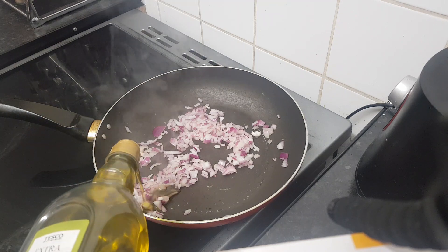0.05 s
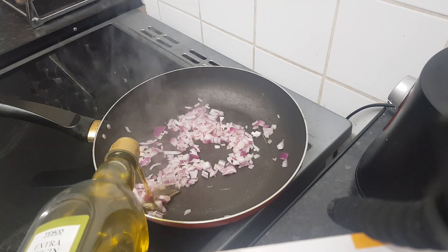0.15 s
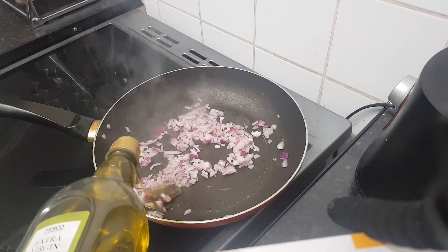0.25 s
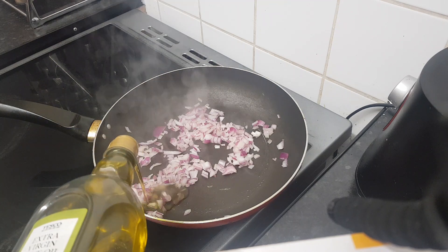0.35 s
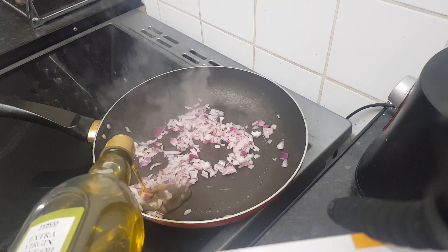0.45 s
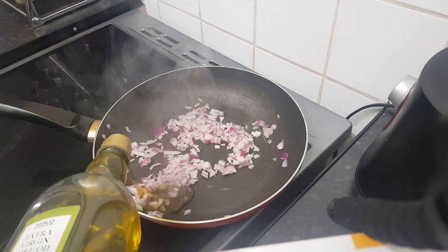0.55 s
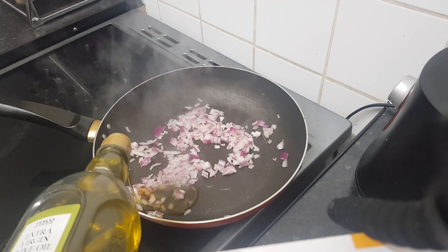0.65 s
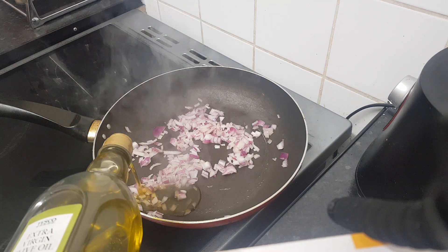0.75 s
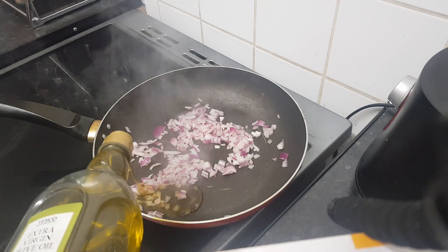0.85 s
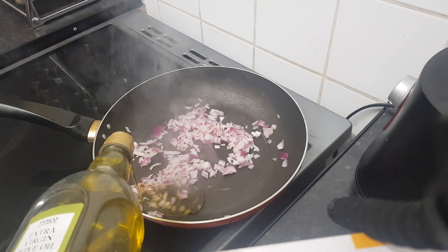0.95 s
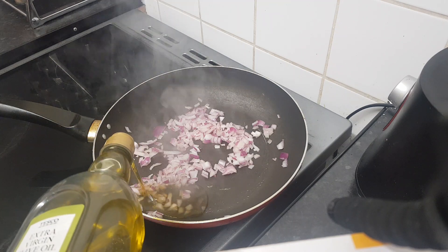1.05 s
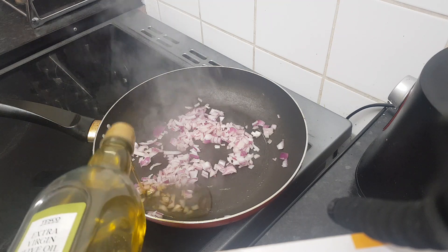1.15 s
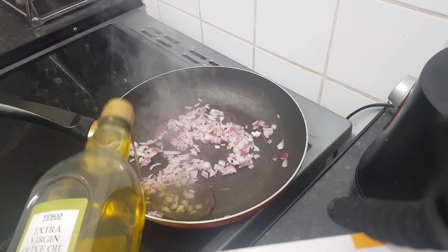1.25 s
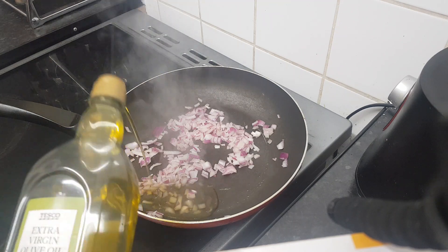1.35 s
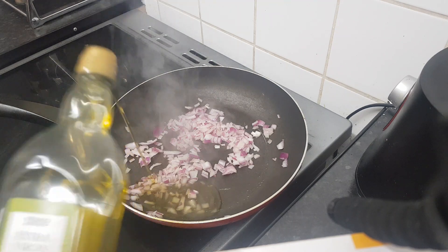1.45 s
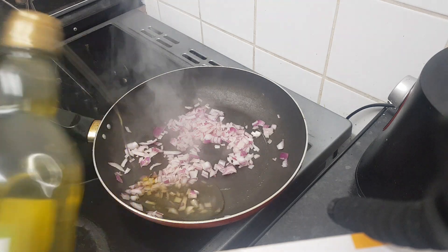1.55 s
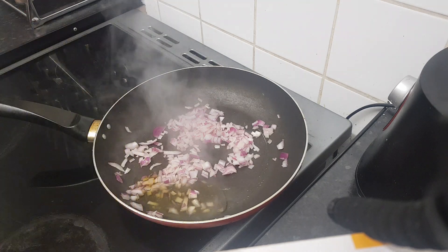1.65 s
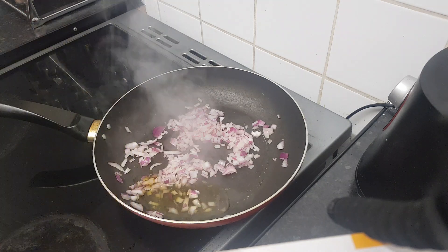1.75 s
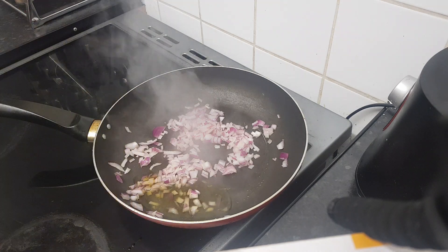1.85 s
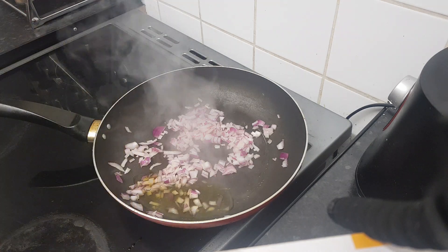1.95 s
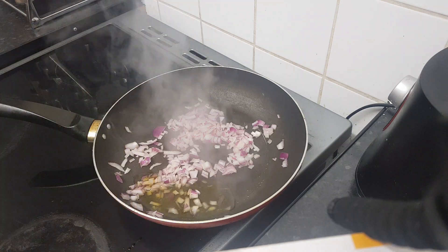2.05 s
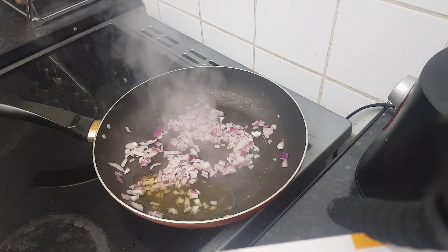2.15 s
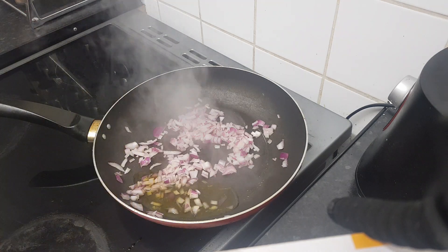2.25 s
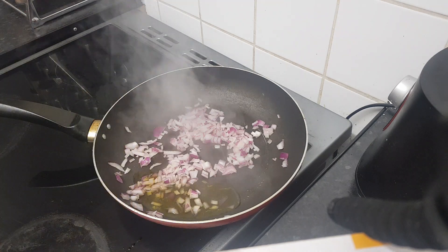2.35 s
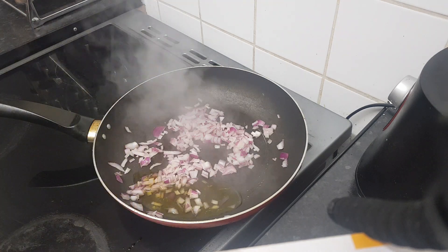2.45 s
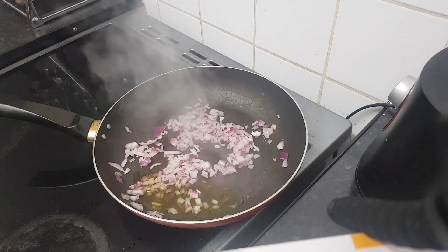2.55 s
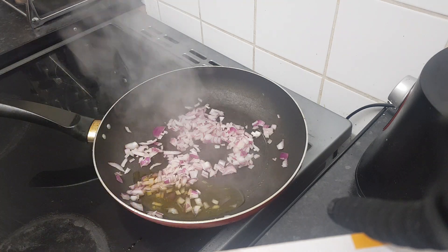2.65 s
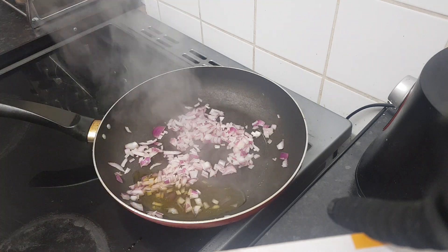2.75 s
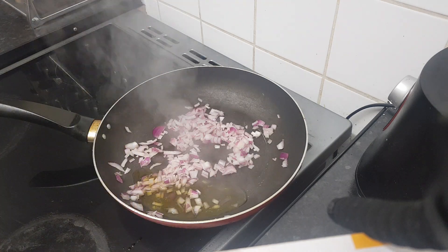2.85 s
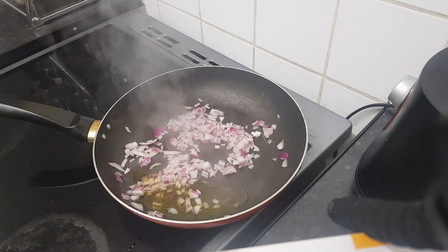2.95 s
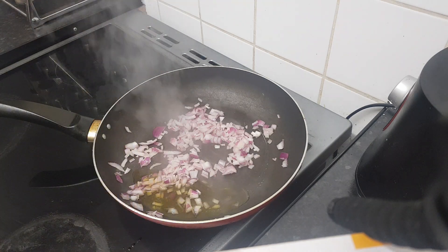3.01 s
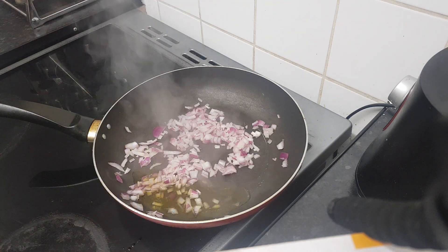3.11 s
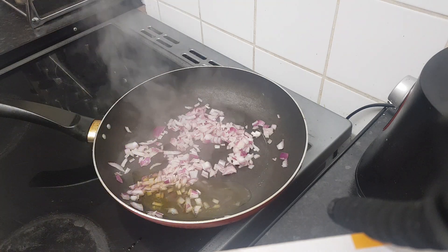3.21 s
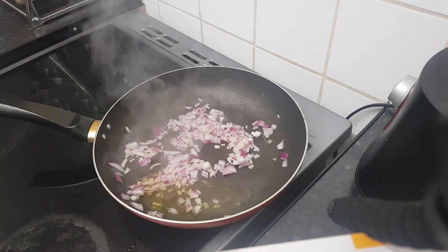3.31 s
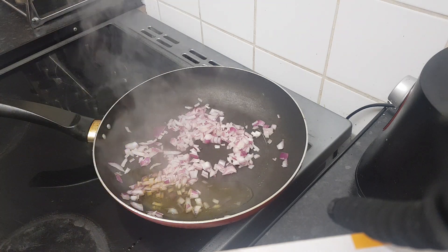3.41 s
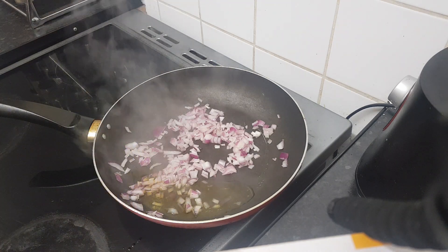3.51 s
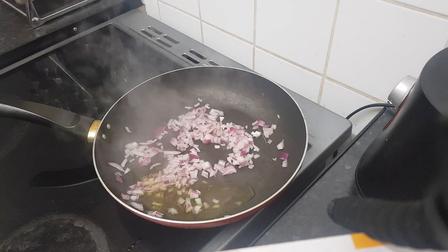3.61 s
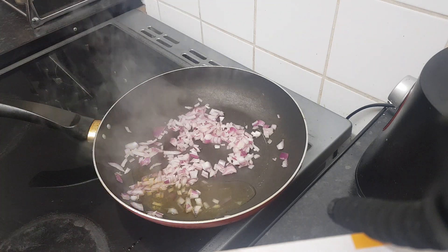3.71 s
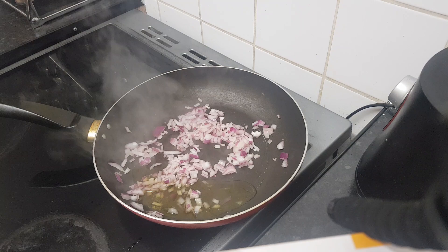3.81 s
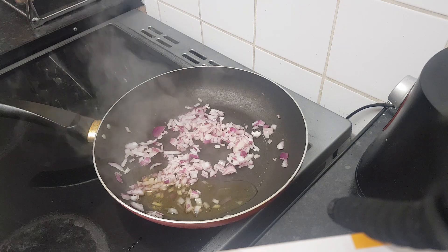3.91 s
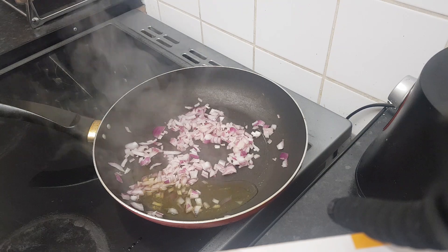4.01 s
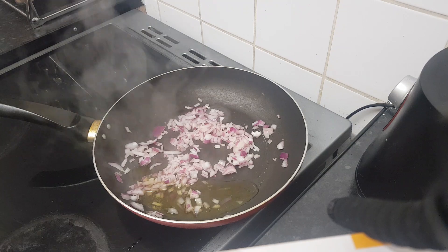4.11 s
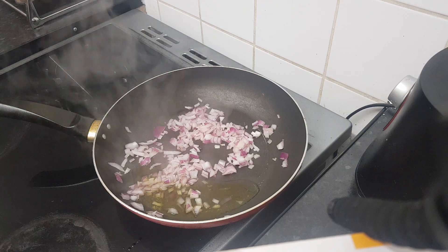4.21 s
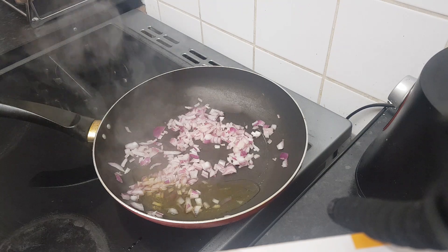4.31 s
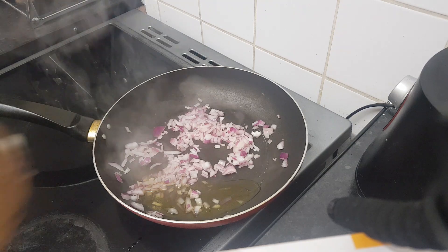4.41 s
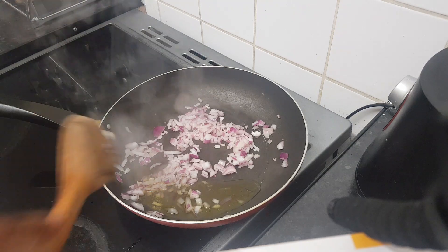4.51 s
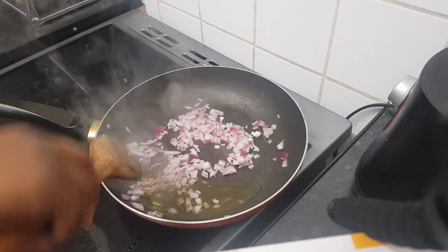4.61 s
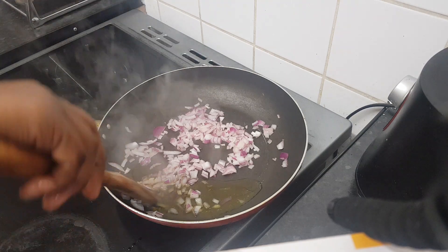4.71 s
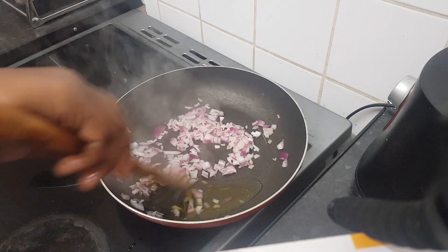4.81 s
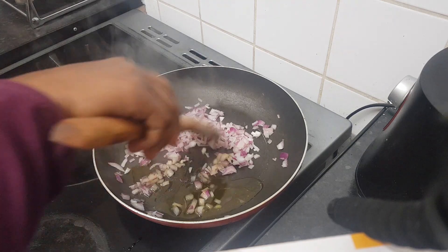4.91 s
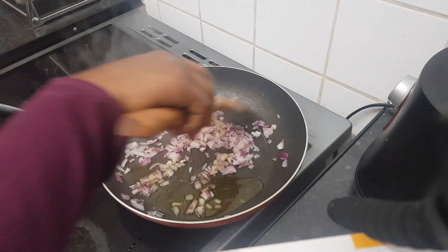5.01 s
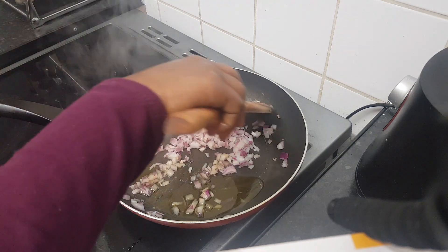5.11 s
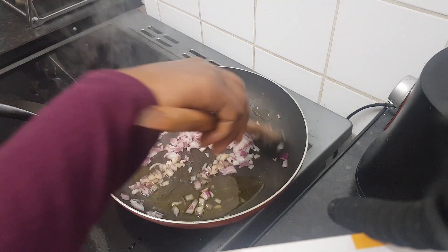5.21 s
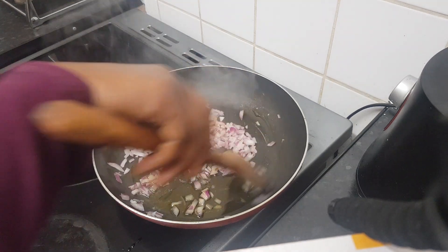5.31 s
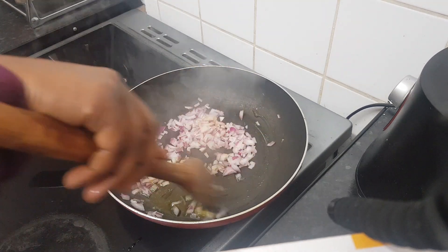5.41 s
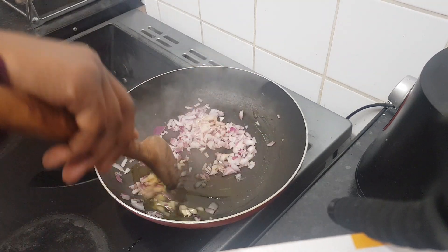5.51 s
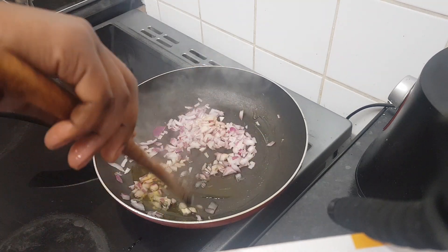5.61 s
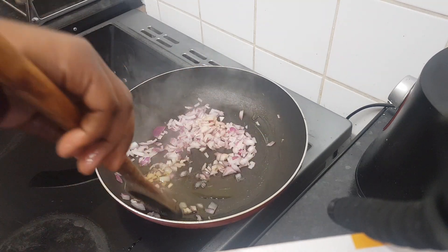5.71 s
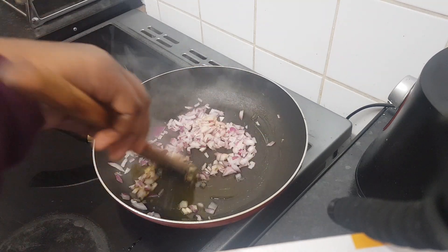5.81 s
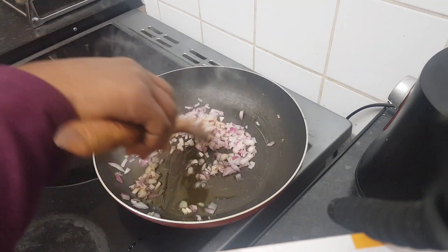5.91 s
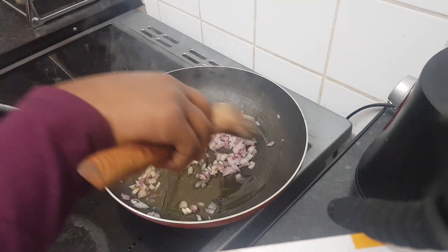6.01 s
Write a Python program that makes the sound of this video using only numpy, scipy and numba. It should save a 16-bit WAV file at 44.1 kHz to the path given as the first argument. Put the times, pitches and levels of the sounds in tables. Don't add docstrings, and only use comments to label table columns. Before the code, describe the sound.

Close, crackling frying with soft bottle thuds, one loud rattling cupboard slam midway, then wooden spoon knocks, a quick scrape and fiercer sizzling.

```python
import sys
import numpy as np
from scipy import signal
from scipy.fft import rfft, irfft
from scipy.io import wavfile
from scipy.ndimage import uniform_filter1d
from numba import njit

SR = 44100
rng = np.random.default_rng(int(sys.argv[2]) if len(sys.argv) > 2 else 0)


def gain_from_decibels(decibels):
    exponent = np.asarray(decibels, float) / 20
    return 10 ** exponent


def log_audio(samples):
    frames = np.atleast_2d(samples).T
    limited = np.clip(frames, -1, 1)
    pcm = np.round(limited * 32767).astype(np.int16)
    wavfile.write(sys.argv[1], SR, pcm)


N = 267246
TIME = np.arange(N) / SR

# frequency in Hz, density in dB per Hz.
FIZZ_SPECTRUM = [(1800, -28.5), (3000, -13.5), (5160, -3), (6800, 1), (8470, -6.5), (10300, 0),
                 (12600, -0.3), (15000, -3.5)]
# frequency in Hz, density in dB per Hz.
BUBBLING_SPECTRUM = [(250, -34.5), (385, -19), (450, -12), (800, -4), (1500, -0.9), (3000, 1), (4500, 0),
                     (7000, -22)]
# frequency in Hz, density in dB per Hz.
EXTRACTOR_SPECTRUM = [(15, -40.5), (25, -4.5), (43, -5.5), (59, -15.5), (91, 1.5), (124, -10), (180, -8),
                      (199, -10.5), (219, -21.5), (247, -17.5), (330, -23), (430, -56.5), (730, -120)]
# start in seconds, level in dB, pitch in Hz, lag of the left port in samples.
LARGE_SPITS = [(.2795, -27, 11500, -3), (.5556, -29, 9500, 7), (.6891, -31, 2900, -4),
               (.9259, -26, 10000, 0), (1.16, -24, 10000, 7), (1.4627, -28, 4300, 1),
               (1.5262, -23, 11500, -3), (1.593, -23, 10500, 2), (1.6096, -28, 2900, 1),
               (1.903, -22, 4000, -5), (2.1136, -27, 6400, 2), (2.5125, -26, 5500, 7),
               (2.5227, -25, 5800, -6), (2.6096, -22, 6800, 0), (2.8131, -29, 4800, -6),
               (2.9456, -26, 11500, -3), (3.1019, -29, 5500, -6), (3.4673, -22, 7500, -3),
               (3.6449, -18, 10500, -3), (4.0799, -27, 5000, -6), (4.5122, -25, 8000, -4),
               (5.1385, -27, 9000, 8), (5.2319, -28, 3800, -2), (5.254, -26, 2900, -1),
               (5.3494, -26, 4000, -2), (5.4973, -19, 7000, -2), (5.7623, -25, 8500, -3),
               (5.613, -28, 3300, -1), (5.897, -25, 6400, 6), (5.9135, -24, 6400, -1)]
# frequency in Hz, length in cycles.
SPIT_RINGS = [(2900, 2.8), (6400, 5.5), (11500, 5.5)]
# time in seconds, fizz level in dB.
HEAT = [(0, -48), (.45, -47.5), (.65, -46), (2.05, -46.5), (2.25, -47), (2.45, -46), (2.65, -46.5),
        (2.85, -46.5), (3.05, -47.5), (4.66, -49), (4.7, -47), (4.84, -47.5), (4.89, -44.5), (5.16, -42.5),
        (5.49, -42), (5.71, -43), (5.93, -39), (6.06, -41)]
# frequency in Hz, level in dB, T60 in seconds.
FLOOR_MODES = [(75, -5.5, 0.24), (94.5, 0.5, 0.17)]
# frequency in Hz, level in dB, T60 in seconds.
WORKTOP_MODES = [(175.6, 2.5, 0.21), (193.8, 0, .18), (247, -6, 0.16)]
# frequency in Hz, level in dB, T60 in seconds.
DOOR_MODES = [(74.7, -43, 0.14), (200.5, -11.5, 0.21), (238, -11.5, 0.13), (249, -26, 0.13),
              (324, -1, 0.17), (440, -20, 0.39), (497, -18.5, 0.15), (600, -11, 0.27), (630, -19.5, 0.063),
              (663, -9, 0.17), (880, -35.5, 0.14), (922, -33, 0.48), (960, -30, 0.17), (1060, -33, 0.19)]
# frequency in Hz, density in dB per Hz.
RATTLE_SPECTRUM = [(88, -40), (150, -10.5), (193, -13.5), (315, -10), (437, -8), (614, -7.5), (826, -17.5),
                   (973, -20.5), (1710, -25), (1870, -25.5), (2870, -26), (4040, -29.5), (5200, -41),
                   (6760, -76.5), (11400, -120)]
# time in seconds, level in dB, centre frequency in Hz.
SPOON_STROKES = [
    [(4.66, -82, 503), (4.7, -56, 620), (4.9, -59, 510), (4.96, -67, 500)],
    [(5.2, -61, 500), (5.3, -56.5, 496), (5.5, -58.5, 600), (5.58, -69, 590)],
    [(5.78, -72, 500), (5.83, -48.5, 655), (5.855, -40.5, 1800), (5.89, -35.5, 2300), (5.915, -36, 3400),
     (5.95, -50, 4500)],
]
# start in seconds, frequency in Hz, level in dB, T60 in seconds.
LID_NOTES = [
    (2.62, 545, -48, 0.5),
    (3.34, 311, -44.5, 1.7),
]
# start in seconds, deep ring in dB, worktop over floor in dB, hardness in dB.
BOTTLE_THUDS = [(1.539, -57, -7, 0), (1.72, -51, -17, -17), (1.823, -48, -7, -13.5),
                (1.984, -48, -11.5, .7), (2.025, -48, 7, .7), (2.059, -53, 14, -3), (2.162, -43, -1.5, 3.5),
                (2.189, -60.5, 4, 12.5), (2.373, -58, -19, -11), (2.669, -55.5, -9, -7)]
# start in seconds, deep ring in dB, worktop over floor in dB, hardness in dB.
CUPBOARD_THUDS = [
    (3.225, -23.5, -13, -9.5),
    (3.259, -28, -17, -2.5),
    (3.394, -30.5, -16, 5.5),
    (3.489, -47, -16, 3),
    (3.566, -39, -8, -10),
    (3.69, -40, 6, -12),
]
# start in seconds, deep ring in dB, worktop over floor in dB, hardness in dB.
SPOON_KNOCKS = [(3.833, -42.5, -10, -1.5), (4.065, -49, 7, -4), (4.672, -64, -5, 9.5),
                (4.789, -41.5, -8, -14), (4.859, -51, -5, 0.5), (5.1655, -33, 9, -4), (5.26, -35, 17, -13),
                (5.349, -50, 0, -4), (5.488, -54, 4, 1.5), (5.741, -40, -1, -1.6), (5.812, -40.5, -10, -5)]
# frequency in Hz, left minus right in dB.
PORT_BALANCE = [(500, 1.5), (2000, 0.85), (5000, 1.5), (9000, 1), (13000, -3)]

ROOM_T60_S = 0.24


def level(x, db):
    return x * gain_from_decibels(db) / np.sqrt(np.mean(x ** 2))


def colour(x, shape, flatten=False):
    spec = rfft(x)
    hz, db = np.transpose(shape)
    if flatten:
        spec = spec / np.sqrt(uniform_filter1d(np.abs(spec) ** 2, size=3000, axis=-1))
    f = np.fft.rfftfreq(x.shape[-1], 1 / SR) + 1
    return irfft(spec * gain_from_decibels(np.interp(np.log(f), np.log(hz), db)), x.shape[-1])


def highpass(x, order, hz):
    return signal.sosfilt(signal.butter(order, hz, "high", fs=SR, output="sos"), x)


def pair(split_hz, n):
    mid, side = rng.standard_normal((2, n))
    side = highpass(side, 2, min(split_hz, 9000))
    return np.array([mid + side, mid - side])


def walk(rate):
    k = int(SR / rate)
    steps = np.repeat(rng.standard_normal(N // k + 1), k)
    return 1.2 * uniform_filter1d(uniform_filter1d(steps, k), k)[:N]


def room(x, t60, split_hz):
    t = np.arange(SR // 2) / SR
    tail = pair(split_hz, len(t)) * 1000 ** (-t / t60) * (t > .003)
    return signal.fftconvolve(x[None], tail / np.sqrt(np.sum(tail ** 2) / 2), axes=1)[:, :N]


def rings(modes, chance, n, rise_ms, detune):
    t = np.arange(n) / SR
    total = np.zeros(n)
    for (hz, db, t60), (strength, tuning) in zip(modes, chance):
        tone = np.sin(2 * np.pi * hz * (1 + detune * tuning) * t)
        total += gain_from_decibels(db + 4.2 * strength) * tone * 1000 ** (-t / t60)
    return (1 - np.exp(-t * 1000 / rise_ms)) * total


@njit
def grains(at, hz, cycles, size, lag, pan):
    out = np.zeros((2, N + 4096))
    for k in range(len(at)):
        s = (2j * np.pi - 3 / cycles[k]) * hz[k] / SR
        turn = np.exp(s)
        n = min(int(2 * cycles[k] * SR / hz[k]) + 2, 2000)
        for c in range(2):
            t = at[k] + 16 + (.5 - c) * lag[k]
            i = int(t) + 1
            z = size[k] * pan[k] ** (.5 - c) * np.exp(s * (i - t))
            for j in range(n):
                out[c, i + j] += z.imag
                z *= turn
    return out[:, 16:N + 16]


def extractor():
    power = gain_from_decibels(-62.5) ** 2
    for s, db, *_ in BOTTLE_THUDS + CUPBOARD_THUDS + SPOON_KNOCKS:
        t = np.clip(TIME - s, 0, None)
        swell = (1 - np.exp(-t / .03)) * 1000 ** (-t / 0.57)
        power = power + (gain_from_decibels(-53.5 + 0.49 * (db + 41.5)) * swell) ** 2
    rumble = level(colour(pair(500, N), EXTRACTOR_SPECTRUM + [(600, -57.5)]), 3.0)
    return rumble * np.sqrt(power) * gain_from_decibels(1.2 * walk(6.3))


def lids():
    out = np.zeros(N + SR)
    for s, *mode in LID_NOTES:
        out[int(s * SR):][:SR] += rings([mode], [(0.0066, 0)], SR, 30., 0)
    return out[:N] * gain_from_decibels(1.5 * walk(12))


def thuds():
    n = SR // 2
    out = np.zeros(N + SR)
    # thuds, edge level in dB, rise in ms, lowest body mode in Hz, frequency ratio spanned by a crowd
    objects = [(BOTTLE_THUDS, -5, 1.34, 390, 1.55),
               (CUPBOARD_THUDS, -9, 3.5, 290, 2.1),
               (SPOON_KNOCKS, -3.5, 0.87, 470, 1.75)]
    crowd_t60_s, crowd_tilt_db = (.09, .06), (5, -5)
    blows = [(*blow, *kind) for rows, *kind in objects for blow in rows]
    chances = 0.6 * rng.standard_normal((len(blows), 2, 3, 2))
    spots = rng.random((len(blows), 2, 16))
    steady = np.zeros((16, 2))
    for blow, chance, spot in zip(blows, chances, spots):
        s, db, worktop_db, hard_db, edge_db, rise_ms, body_hz, span = blow
        places = (np.arange(16) + spot) / 16
        body, edge = [
            [(body_hz * span ** (k + u), -5.5 + crowd_tilt_db[k] * (u - .5), crowd_t60_s[k]) for u in place]
            for k, place in enumerate(places)]
        parts = [(FLOOR_MODES, -max(worktop_db, 0), chance[0]),
                 (WORKTOP_MODES, min(worktop_db, 0), chance[1]),
                 (body, hard_db, steady),
                 (edge, edge_db + 1.2 * hard_db, steady)]
        push_ms = rise_ms * gain_from_decibels(-.6 * min(hard_db, 0))
        for modes, share_db, luck in parts:
            out[int(s * SR):][:n] += gain_from_decibels(db + share_db) * rings(modes, luck, n, push_ms, 0.069)
    return out[:N] * (1 + 0.44 * walk(160))


def slam():
    slam_s = 3.3377
    t = TIME - slam_s
    puff = gain_from_decibels(.5) * np.exp(-.5 * (t * 1000 / 1.0) ** 2) * np.sin(2 * np.pi * 420 * t + .4)
    puff += gain_from_decibels(-15) * np.exp(-.5 * ((t + 0.003) / .0013) ** 2) * np.cos(2 * np.pi * 380 * (t + .002))
    start = int(slam_s * SR)
    panel = rings(DOOR_MODES, np.zeros((len(DOOR_MODES), 2)), SR, 8.5, 0) * gain_from_decibels(-4)
    after = np.clip(t + 0.001, 0, None)
    shaking = 1000 ** (-after / 0.25) * (1 - np.exp(-after / 0.007))
    first_jolt = 1.1 * np.exp(-after / .002)
    rattle = level(colour(pair(250, N), RATTLE_SPECTRUM), -11.0) * (after > 0) * (shaking + first_jolt)
    return puff + np.pad(panel, (start, N - start - SR)), rattle


def spoon():
    out = np.zeros((2, N))
    for stroke in SPOON_STROKES:
        s, db, hz = np.transpose(stroke)
        length_s = s[-1] - s[0]
        u = rng.random((int(3000 * length_s), 3)).T
        at = s[0] + u[0] * length_s
        size = gain_from_decibels(np.interp(at, s, db) - 1.1 * np.log(1 - u[1]) + 7 * (u[2] - .5))
        pitch = np.interp(at, s, hz) * 2 ** (2.3 * (u[2] - .5))
        one = np.ones(len(at))
        out += grains(at * SR, pitch, 3.8 * one, size, -2.2 * one, one)
    return out


def bubbles(lo_hz, hi_hz, cycles, spread_db, lag_spread, count):
    u = rng.random((count, 6)).T
    size = gain_from_decibels(spread_db * np.minimum(-np.log(1 - u[2]), 4.9)) * np.sign(u[4] - .5)
    lags = np.clip(-2.2 + lag_spread * (u[3] - u[5]), -28, 28)
    pitch = lo_hz * (hi_hz / lo_hz) ** u[1]
    return grains(u[0] * N, pitch, np.full(count, cycles), size, lags, np.ones(count))


def spits(fizz_db, count):
    u = rng.random((count, 4)).T
    small_db = fizz_db[(u[0] * N).astype(int)] + 12 - 2 * np.log(1 - .85 * u[1])
    small = [u[0] * N / SR, small_db, 2900 * 4 ** u[2], 16 * u[3] - 9]
    s, db, pitch, lag = np.hstack([np.transpose(LARGE_SPITS), small])
    one = np.ones(len(s))
    out = np.zeros((2, N))
    for hz, cycles in SPIT_RINGS:
        size = -gain_from_decibels(db + 4 - 6 * np.abs(np.log2(hz / pitch)))
        out += grains(s * SR, hz * one, cycles * one, size, lag, one)
    out = highpass(out, 3, 1400)
    return out + gain_from_decibels(-4) * room(out[0], 0.05, 1000)


def frying(fizz_db):
    fine = level(bubbles(3000., 15000.0, 2.9, 3.05, 5.9, count=60000), 0) + level(pair(1200, N), -3.6)
    coarse = level(bubbles(880.0, 5000., 0.75, 1.5, 19.0, count=25000), 0) + level(pair(500, N), -0.017)
    stirring_db = fizz_db + 47
    coarse_db = -4 - 0.27 * stirring_db
    top_db = -0.42 - 0.28 * stirring_db
    shared = .65 * walk(14)
    fine = colour(fine, FIZZ_SPECTRUM, True)
    top = signal.sosfiltfilt(signal.butter(4, 8500, "high", fs=SR, output="sos"), fine)
    fine = level(fine - top, 2.16) + level(top, 4.3) * gain_from_decibels(top_db + 0.73 * walk(11))
    fine = fine * gain_from_decibels(fizz_db + shared + .5 * walk(40))
    coarse = level(colour(coarse, BUBBLING_SPECTRUM, True), 3.86)
    coarse = coarse * gain_from_decibels(fizz_db + coarse_db + shared + 0.92 * walk(45))
    return fine + coarse + spits(fizz_db, count=70)


def gain_db():
    opening = -3 * np.exp(-TIME / 0.14)
    sink = 1 - np.exp(-np.clip(TIME - 3.447, 0, None) / 0.2)
    recovery = np.clip(1 - (TIME - 4.368) / 0.27, 0, 1)
    return opening - 7 * sink * recovery


def scene():
    door, rattle = slam()
    knocks = highpass(thuds(), 2, 62) + lids()
    wet = gain_from_decibels(-10) * room(door, ROOM_T60_S, 200) + room(knocks, ROOM_T60_S, 250)
    door = np.array([np.roll(door, shift=14) * gain_from_decibels(-1.4), door])
    pan = frying(np.interp(TIME, *np.transpose(HEAT)))
    return pan + extractor() + door + rattle + knocks + wet + spoon()


def band_limit(x):
    return signal.sosfilt(signal.butter(12, 16980, fs=SR, output="sos"), x)


def record(dry):
    ridden = dry * gain_from_decibels(gain_db())
    x = np.array([colour(port, [(hz, sign * db / 2) for hz, db in PORT_BALANCE])
                  for port, sign in zip(ridden, (1, -1))])
    x = np.clip(highpass(x, 2, 38), -1, 1)
    x = signal.sosfiltfilt(signal.ellip(10, .1, 60, 15820, fs=SR, output="sos"), x)
    return band_limit(x)


dry = scene()
out = record(dry)
log_audio(out)
```